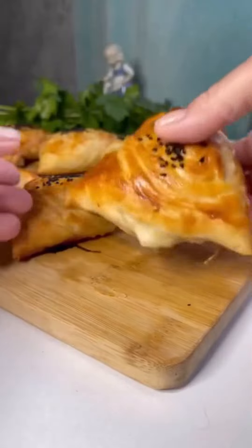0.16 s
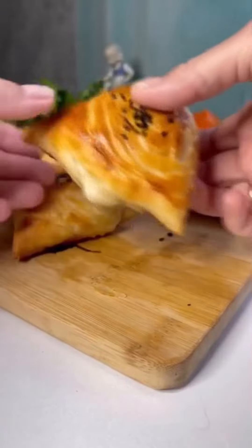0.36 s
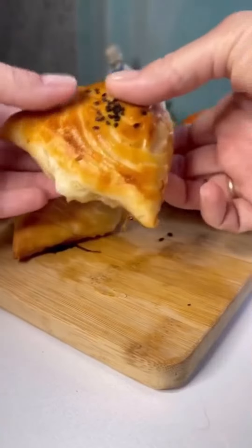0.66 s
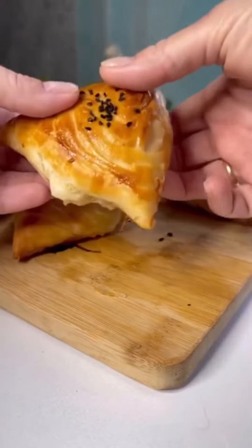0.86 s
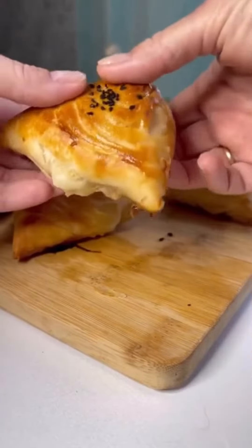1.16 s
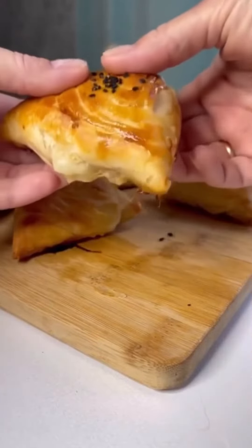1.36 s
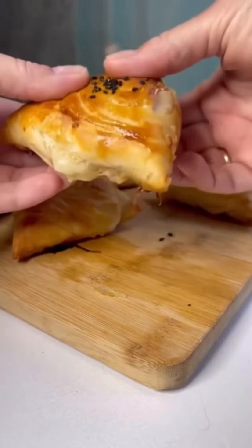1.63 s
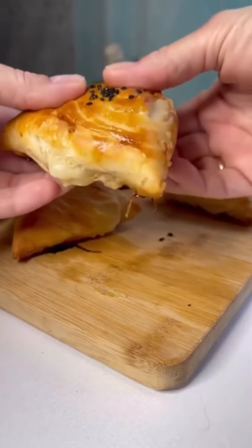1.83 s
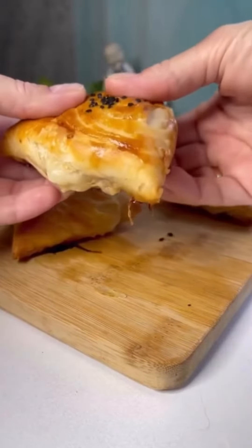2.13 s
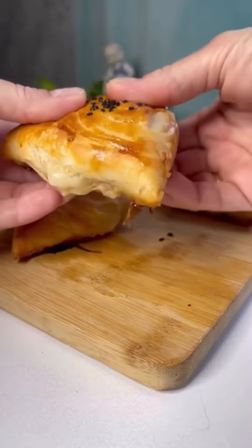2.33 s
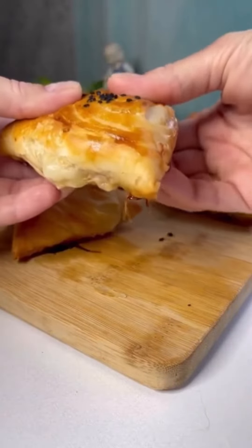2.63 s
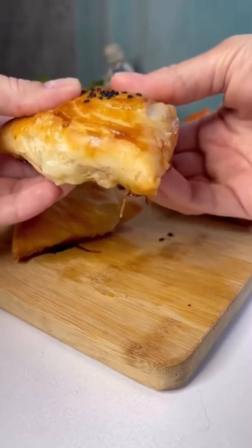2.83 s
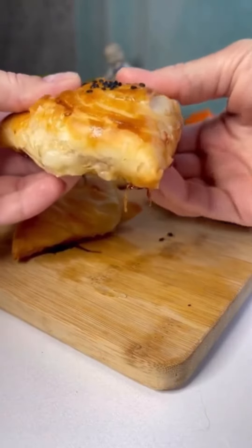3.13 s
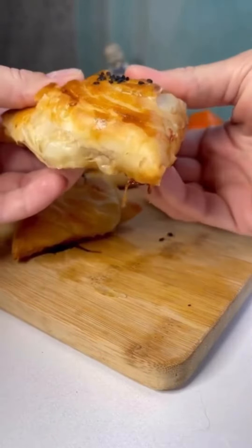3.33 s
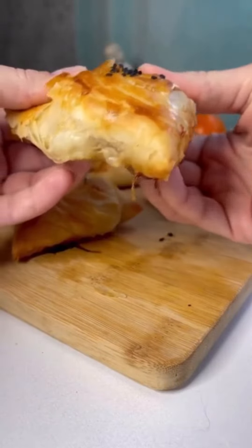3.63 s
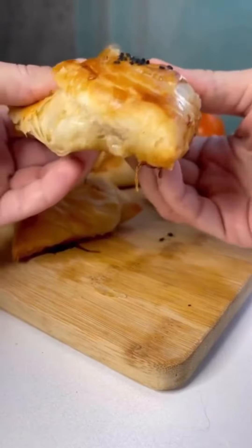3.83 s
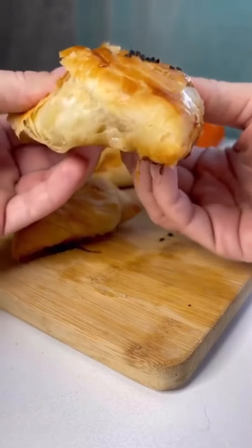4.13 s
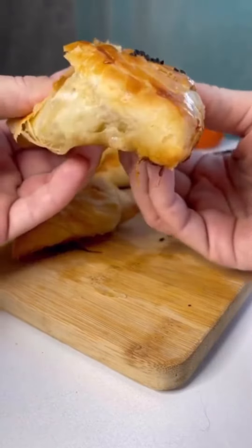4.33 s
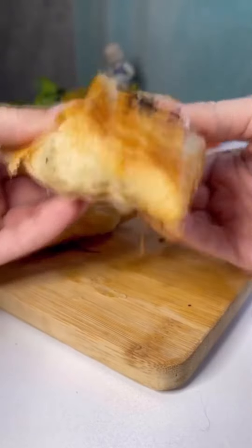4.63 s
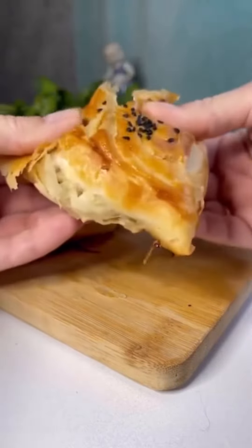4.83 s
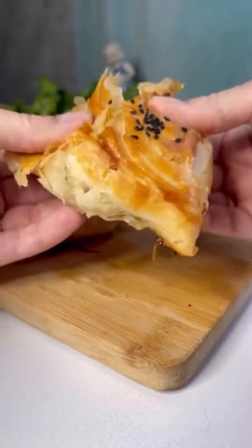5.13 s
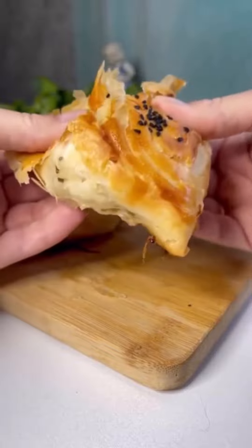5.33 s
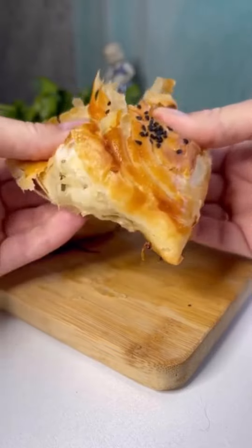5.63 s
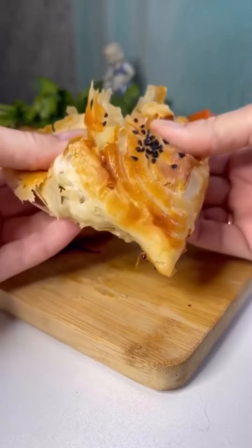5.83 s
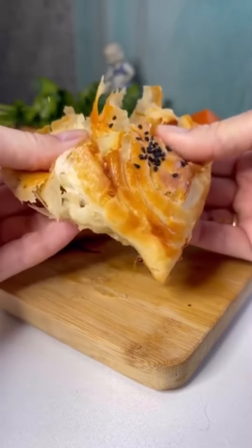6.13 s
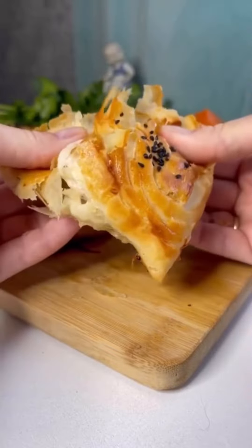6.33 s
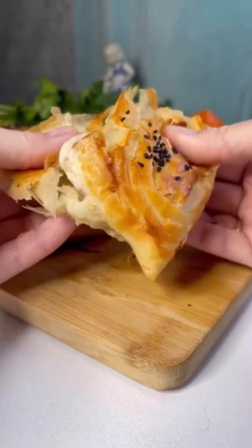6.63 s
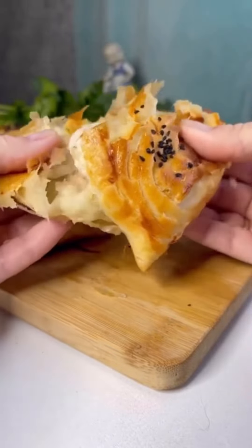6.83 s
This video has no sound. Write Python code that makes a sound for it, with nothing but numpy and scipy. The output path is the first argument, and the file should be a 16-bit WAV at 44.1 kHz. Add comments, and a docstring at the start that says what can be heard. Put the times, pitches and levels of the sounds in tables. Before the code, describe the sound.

A close phone microphone in a small kitchen, nearly dry with a brief reverberant tail. A quiet low appliance drone throbs about ten times a second over soft air noise and faint hiss throughout. For the first second there is little else: a tiny tick near 0.65 and a soft, low, falling bump at 0.9. At 1.1 crisp crust snaps break out, clustering until 1.4, with small hollow knocks. After a lull, crackling resumes at 1.6 and thickens from 2 to 3, brittle bursts over fine crumbling. The sharpest, brightest crack comes at 3.2; strong crunches continue to 3.9. From 4 to 4.8 it thins to light, fine, papery crackle, with a faint bump near 4.5. Moderate snaps return from 4.9 to 5.8, sharpest around 5.3, 5.6 and 5.7. After 6 there are sparse ticks and weak crumbling, a clearer snap near 6.45, then mostly hum until 7.

```python
"""A flaky pastry pulled apart

Two hands slowly pull a flaky baked pastry apart, close to a phone in a small kitchen.
The crust snaps in avalanches of tiny ringing fractures, over a fine crumbling of thin layers, and the
hollow body knocks in damped modes. Behind it an appliance drones and throbs as modulated sines over
filtered noise; the hands make two soft bumps of falling pitch, and a faint hiss lies under all."""
import sys
import numpy as np
from scipy import signal
from scipy.fft import rfft, irfft, next_fast_len
from scipy.io import wavfile
from scipy.ndimage import uniform_filter1d, map_coordinates

SR = 44100
rng = np.random.default_rng(int(sys.argv[2]) if len(sys.argv) > 2 else 0)


def waveform_to_disk(signal):
    """Save audio, clipped to [-1, 1], as 16-bit WAV at the path in sys.argv[1]."""
    frames = np.transpose(np.atleast_2d(signal))
    scaled = np.clip(frames, -1, 1) * 32767
    samples = np.round(scaled).astype(np.int16)
    wavfile.write(sys.argv[1], SR, samples)


N = 307332  # samples, just under 7 s


def amp(db):
    """Level is logarithmic: 20 dB make a tenfold amplitude."""
    return 10 ** (np.asarray(db) / 20)


def unit(x):
    """Mean power sets the level: scale to rms 1."""
    return x / np.sqrt(np.mean(x ** 2) + 1e-20)


def along(points, hz):
    """Pitch is logarithmic: interpolate (Hz, value) points on a log frequency axis."""
    f, v = np.transpose(points)
    return np.interp(np.log(hz + 1), np.log(f + 1), v)


def curve(rows):
    """Slow control: interpolate (second, value) rows linearly, holding the end values."""
    return np.interp(np.arange(N) / SR, *np.transpose(rows))


def wobble(rate):
    """Band-limited random modulation: a smooth curve through random knots, rate of them a second."""
    knots = rng.standard_normal(2000)
    return map_coordinates(knots, [np.arange(N) * rate / SR], mode="wrap")


def coloured(x, gain_db):
    """Minimum-phase filtering: folding the cepstrum makes a gain in dB by frequency causal."""
    size = 2 * next_fast_len(len(x) // 2 + 1024)
    gain = amp(gain_db(np.fft.rfftfreq(size, 1 / SR)))
    cepstrum = irfft(np.log(gain + 1e-6))
    cepstrum[1:size // 2] *= 2
    cepstrum[size // 2 + 1:] = 0
    response = np.exp(rfft(cepstrum))
    return irfft(rfft(x, size) * response, size)[:len(x)]


def band(points, hz):
    """Band limiting: a spectrum in dB, falling 24 dB per octave below its points and 96 above."""
    octaves_above = np.maximum(np.log2((hz + 1) / points[-1][0]), 0)
    octaves_below = np.maximum(np.log2(points[0][0] / (hz + 1)), 0)
    return along(points, hz) - 96 * octaves_above - 24 * octaves_below


def resonances(peaks, hz):
    """Resonance: a sum in dB of bell-shaped (Hz, half width Hz, dB) peaks and notches."""
    return sum(db / (1 + ((hz - centre) / width) ** 2) for centre, width, db in peaks)


def hiss():
    """Stationary random noise: the microphone's faint, steady hiss."""
    # Spectrum of the hiss. Each row: frequency in Hz, relative density in dB per Hz.
    hiss_colour = [(1000, 2), (4000, 16), (8200, 14.5), (9200, -16), (10100, 20.5), (11000, 21.5),
                   (11700, -18)]
    return amp(-66.0) * unit(coloured(rng.standard_normal(N), lambda hz: band(hiss_colour, hz)))


def throb(hz, db, beats_per_s, depth, ebb, ebb_every_s):
    """Amplitude modulation: a tone swells and sinks with an uneven beat that ebbs and returns."""
    t = np.arange(N) / SR
    beat = np.cos(2 * np.pi * beats_per_s * t + 1.0 * wobble(0.92))
    beat_depth = depth - ebb * np.cos(2 * np.pi * t / ebb_every_s)
    carrier = np.sin(2 * np.pi * hz * t + 0.42 * wobble(5.3))
    return amp(db) * unit((1 + beat_depth * beat) * carrier)


def appliance():
    """Additive synthesis: a throbbing drone and phase-modulated tones over resonant air noise."""
    # Steady motor and fan tones. Each row: frequency in Hz, rms level in dB before the overall gain.
    hum_tones = [(59.7, -62.5), (148, -66.5), (152.5, -62.5), (256, -65.5), (339, -65.5), (420, -66),
                 (462, -64.5), (619, -66), (764.5, -68), (875, -75.5), (1017, -74), (1120, -85)]
    # Air noise in the room. Each row: frequency in Hz, relative density in dB per Hz.
    air_colour = [(20, -16), (42, -4.5), (58, 1), (78, -4), (135, -4), (190, -1.5), (300, -4), (500, -6.5),
                  (640, -6), (800, -18), (950, -26.5), (1160, -14), (1400, -18), (1800, -21.5),
                  (2600, -18.5), (3200, -28), (5000, -32)]
    # Room resonances and notches in the air noise. Each row: centre in Hz, half width in Hz, gain in dB.
    room_peaks = [(265, 7.7, 1.5), (372, 14, -2), (422, 17, 5.5), (487, 16, -5), (529, 12, 4),
                  (623, 35, 3.5), (729, 16, -5.5), (780, 15, 6.5), (1163, 22, 4), (2540, 120, 2.5)]
    # Overall gain with one brief dip, ends held. Each row: time in seconds, gain in dB.
    dip = [(0.821, -1.5), (0.826, -13), (0.845, -19), (0.849, -1.5)]
    t = np.arange(N) / SR

    def tone(hz):
        """Phase modulation: the higher the tone, the more the motor's flutter blurs it."""
        flutter = 0.12 * wobble(3.88) + hz / 440 * wobble(30)  # radians
        wave = np.sin(2 * np.pi * (hz * t + rng.random()) + flutter)
        return unit(amp(2.8 * wobble(7)) * wave)  # each tone fades in and out by itself

    tones = sum(amp(db) * tone(hz) for hz, db in hum_tones)
    noise = rng.standard_normal(N)
    air = unit(coloured(noise, lambda hz: band(air_colour, hz) + resonances(room_peaks, hz)))
    air_gain = amp(-50.0 + 0.43 * wobble(5))
    drone = throb(hz=189.2, db=-52.5, beats_per_s=10.15, depth=0.61, ebb=0.23, ebb_every_s=1.83)
    return (drone + tones + air_gain * air) * amp(curve(dip))


def kitchen(x, t60, delay):
    """Diffuse reverberation: board and near walls answer with a short, exponentially fading tail."""
    t = np.arange(SR // 2) / SR
    tail = rng.standard_normal(len(t)) * amp(-60 * t / t60) * (t > delay)  # both times in seconds
    return signal.fftconvolve(x, tail / np.linalg.norm(tail))[:N]


def bumps():
    """Gliding pulse: as the hands shift their grip, a low, brief push sags in pitch."""
    # Soft bumps. Each row: centre in seconds, envelope peak in dB, pitch at the centre in Hz,
    # time from the peak to 1/e in ms, fall in octaves per second.
    hand_bumps = [(0.918, -38.5, 100, 6.5, 71), (4.472, -44.5, 75.2, 16, 3.1)]
    t = np.arange(-SR // 8, SR // 8) / SR
    out = np.zeros(N)
    for s, db, hz, length_ms, fall in hand_bumps:
        phase = 2 * np.pi * np.cumsum(hz * 2 ** (-fall * t)) / SR
        swell = np.exp(-(1000 * t / length_ms) ** 2)
        out[round(s * SR) - len(t) // 2:][:len(t)] += amp(db) * swell * np.sin(phase)
    return out


def knocks():
    """Modal synthesis: the soft, hollow body rings in damped modes as a larger piece lets go."""
    # Knocks. Each row: start in seconds, level in dB to which the mode levels are added.
    knock_times = [(1.13, -57), (1.175, -59), (1.215, -56), (1.527, -55), (2.112, -56.5), (2.194, -61),
                   (2.753, -57.5), (2.823, -53), (2.914, -55), (4.44, -56), (5.325, -55)]
    # Modes of the hollow pastry. Each row: frequency in Hz, mean relative level in dB, t60 in seconds.
    hollow_modes = [(496, 10, 0.074), (630, 15.5, 0.09), (710, 5, 0.075)]
    t = np.arange(SR // 8) / SR
    onset = 1 - np.exp(-t / 0.0025)
    out = np.zeros(N)
    for s, db in knock_times:
        ring = np.zeros(len(t))
        for hz, level, t60 in hollow_modes:
            fading = amp(level + rng.normal(0, 2) - 60 * t / t60)
            ring += fading * np.sin(2 * np.pi * hz * t)
        out[round(s * SR):][:len(t)] += amp(db) * ring * onset
    return out


def splinters(when, size, life_ms, length):
    """Impulsive excitation: each tiny fracture, at its sample, rings briefly at a pitch of its own."""
    t = np.arange(96) / SR
    count = len(when)
    hz = rng.uniform(800, 13500, (count, 1))
    life = life_ms / 1000 * np.exp(0.5 * rng.standard_normal((count, 1)))
    signed_size = (size * rng.choice([-1, 1], count))[:, None]
    # dividing by the root of the life keeps long rings from carrying more energy
    rings = signed_size * np.sin(2 * np.pi * hz * t) * np.exp(-t / life) / np.sqrt(life)
    places = when[:, None] + np.arange(len(t))
    return np.bincount(places.ravel(), rings.ravel(), length)[:length]


def fractures(length, count, spread_db, life_ms, rub):
    """Shot noise: splinters of unequal size over the noisy rub of the broken faces; rms 1."""
    size = amp(spread_db * np.clip(rng.standard_normal(count), -2, 2))
    shower = splinters(rng.integers(length, size=count), size, life_ms, length)
    return unit(unit(shower) + rub * rng.standard_normal(length))


def clumps(count):
    """Clustered shot noise: an rms 1 envelope of unequal little avalanches, each starting sharply."""
    spread_db, decay_ms = 3.0, 7.0
    steady = 0.75  # constant power between the avalanches, against their mean power of 1
    size = amp(spread_db * np.clip(rng.standard_normal(count), -2, 1.5))
    starts = ((np.arange(count) + rng.random(count)) * N / count).astype(int)
    ms = np.arange(SR // 30) / SR * 1000
    shape = (1 - np.exp(-ms / 0.5)) * np.exp(-ms / decay_ms)
    power = abs(signal.fftconvolve(np.bincount(starts, size ** 2, N), shape ** 2)[:N])
    return unit(np.sqrt(power / power.mean() + steady))


def dappled(x, depth_db):
    """Time-varying spectrum: the colour shifts as one flake after another takes the strain; rms 1."""
    z = signal.stft(x, nperseg=256)[2]
    field = rng.standard_normal(z.shape)
    field = uniform_filter1d(field, size=4, axis=0)  # smooth over frequency
    field = uniform_filter1d(field, size=6, axis=1)  # smooth over time
    return unit(signal.istft(z * amp(depth_db * unit(field)), nperseg=256)[1][:N])


def crumbling():
    """Size sets spectrum: thin layers splinter in clumps, large flakes sounding lower and longer."""
    # Strain of the layers. Each row: time in seconds, crumbling level in dB before random fluctuation.
    strain_level = [(0.0, -88), (0.5, -91), (0.59, -62), (0.67, -83), (1.06, -71), (1.12, -51.5),
                    (1.38, -49.5), (1.44, -54.5), (1.51, -59), (1.68, -47), (1.81, -51), (1.9, -47),
                    (1.97, -52), (2.005, -62), (2.07, -45), (2.22, -42.5), (2.26, -50.5), (2.33, -46.5),
                    (2.53, -53.5), (2.72, -45.5), (2.95, -44.5), (3.17, -48.5), (3.31, -44.5),
                    (3.42, -47.5), (3.47, -52), (3.62, -43), (3.68, -51.5), (3.79, -43), (3.91, -56),
                    (4.12, -46), (4.215, -60), (4.26, -53.5), (4.4, -52.5), (4.57, -56), (4.63, -63),
                    (4.77, -60.5), (4.8, -53), (4.84, -59), (4.9, -47.5), (4.955, -55.5), (5.0, -46),
                    (5.38, -48.5), (5.44, -59.5), (5.5, -47), (5.76, -53), (5.785, -51), (5.85, -49.5),
                    (5.95, -57), (6.13, -52.5), (6.19, -58), (6.235, -83), (6.29, -55), (6.33, -62),
                    (6.37, -53.5), (6.64, -51.5), (6.73, -66), (6.97, -58)]
    # Splinter size. Each row: time in seconds, brightness in dB as small flakes' gain over large ones.
    fineness = [(0.6, 0.5), (1.1, -11), (1.6, -7), (2.1, -3.5), (3.0, -1), (3.8, -5), (4.36, 11),
                (4.48, 15.5), (4.75, 3), (4.9, 1), (5.2, -2), (5.7, 3.5), (6.9, -5)]
    # Colour of the crumbling. Each row: frequency in Hz, relative density in dB per Hz.
    flake_colour = [(300, -47), (900, -5), (1250, -22), (1750, -0.5), (2300, -3.5), (2750, 1.5), (4750, -3),
                    (8100, -2.5), (8700, -9), (9600, -4), (10100, 0), (11200, 3.5), (11700, -3),
                    (12800, -27)]
    strain = amp(curve(strain_level) + 1.25 * wobble(35)) * clumps(count=800)
    fine = amp(curve(fineness) / 2)  # half the contrast goes to each size
    large = fractures(N, count=9000, spread_db=3, life_ms=0.11, rub=1.0)
    large = amp(0.5 * wobble(70)) * large / fine
    small = fractures(N, count=14000, spread_db=3, life_ms=0.06, rub=1.0)
    small = amp(1.1 * wobble(78)) * small * fine
    low_tilt = [(3000, -6.5), (7000, 3.5), (10000, -5)]  # Hz, dB
    high_tilt = [(3000, -2.0), (7000, -1.0), (10000, 6.5)]
    low = coloured(large, lambda hz: band(flake_colour, hz) + along(low_tilt, hz))
    high = coloured(small, lambda hz: band(flake_colour, hz) + along(high_tilt, hz))
    return strain * dappled(low + high, depth_db=2.5)


def avalanche(ms, decay_ms):
    """Chain reaction: an accelerating build-up to the peak at 0 ms, then exponential dying away."""
    rise_ms = 3.9 + 0.22 * decay_ms  # a longer avalanche also builds up longer
    return np.exp(-np.where(ms < 0, (abs(ms) / rise_ms) ** 1.4, ms / decay_ms))


def flake(body_db, bright_db, ring_hz, ring_db):
    """Modal colour: a flake's gain in dB by frequency, with a tilt, one main resonance and weak ones."""
    # Common colour of a crust fracture. Each row: frequency in Hz, relative density in dB per Hz.
    crust_colour = [(300, -7.5), (900, -21), (1250, -15), (1750, -17), (2250, -10.5), (2750, -8.5),
                    (4750, -6), (8100, 1.5), (8700, 1), (9500, -2.5), (10100, 10), (11200, 10.5),
                    (11700, 4), (12800, -7.5)]
    ring_width_hz, ripple_db = 570, 3.5  # half width of the main resonance, depth of the weak ones
    tilt = [(800, 0), (1150, body_db / 2), (1600, body_db / 3), (2000, body_db), (3000, body_db),
            (5000, 0), (8000, 0.0049), (10500, bright_db), (11500, bright_db), (12900, bright_db / 2)]
    heights = np.pad(rng.standard_normal(70), 1)
    weak = np.column_stack([np.geomspace(1200, 13000, num=72), heights])

    def gain_db(hz):
        """Superposition in dB of the flake's resonances on the crust's colour."""
        strong = ring_db / (1 + ((hz - ring_hz) / ring_width_hz) ** 2)
        return band(crust_colour, hz) + along(tilt, hz) + strong + ripple_db * along(weak, hz)

    return gain_db


def snaps():
    """Cascading fracture: each break sets off its neighbours, swelling to a peak and dying out."""
    # Snaps of the crust. Each row: peak time in seconds, level in dB before nearby reflections,
    # decay to 1/e in ms, lower mids (2 to 3 kHz) in dB, brightness (10.5 to 11.5 kHz) in dB,
    # pitch of the flake in Hz, height of its resonance in dB.
    crust_snaps = [(0.648, -43, 4, 10, -6, 5160, 7), (1.09, -37.5, 4.4, 8, -12, 4850, 12),
                   (1.102, -31, 3.3, 8.5, -2, 7800, 12), (1.13, -33.5, 8.3, 9.5, -9.5, 1400, 4),
                   (1.153, -35.5, 22, 7, -8, 8500, 3), (1.175, -37, 6.8, 10, -8, 7050, 9),
                   (1.21, -37, 19, -2, -7, 2700, 12.5), (1.222, -34, 12, 4.5, -1, 6600, 6),
                   (1.268, -40.5, 18, -3, -10, 2400, 10), (1.297, -31.5, 3.2, 8, -1.5, 4800, 6),
                   (1.319, -35, 6, 2, -4.5, 2700, 2), (1.327, -28.5, 5.7, 0, 3, 3900, 4),
                   (1.335, -26, 10, 1.5, 4.5, 4200, 5), (1.352, -36.5, 21, 2, -17, 5400, -1),
                   (1.373, -36.5, 17, -1.5, 3, 2670, 17), (1.424, -46, 12, 12, -8, 3000, 3),
                   (1.468, -49, 38, -5, -1, 7400, 15), (1.528, -39.5, 12, 11, -5, 4950, 0),
                   (1.55, -42, 37, -8, -8, 2400, 7), (1.625, -36, 13, -1, -3.5, 2380, 9),
                   (1.648, -34.5, 16, 1.5, -4, 2370, 9), (1.675, -39, 11, 8, -15, 7740, 9),
                   (1.691, -42, 6.6, 5, -21, 3900, 4), (1.742, -43.5, 20, 7, -13, 5740, 13),
                   (1.829, -24.5, 3.0, 5.5, -17.5, 5170, 7), (1.876, -40.5, 17, 10, -9, 4800, 3),
                   (1.955, -37.5, 15, 4.5, -23, 4650, 3), (1.975, -29.5, 8.7, 9.5, 3.5, 5600, 7),
                   (2.02, -29, 3.5, 1, 7, 5900, 8), (2.053, -29.5, 3.1, 8, -18, 8040, 16.5),
                   (2.104, -33, 22, 3.5, -15, 4130, 4), (2.136, -43, 16, 5, -5, 5400, 2),
                   (2.193, -29.5, 8.9, 3.5, -3.5, 7460, 3), (2.27, -46, 8.2, 7, -7, 5000, 4),
                   (2.386, -32.5, 7.6, -1.5, -7, 2370, 6), (2.469, -45.5, 14, 3, -14, 6400, 3),
                   (2.563, -42, 5.6, 9, -3, 2670, 19), (2.599, -38, 39, 8.5, -11, 5400, 10.5),
                   (2.635, -40, 24, -9, -7, 5760, 5), (2.683, -34.5, 5.6, 15, -2, 6300, 5),
                   (2.753, -25, 6.3, 11.5, -4.5, 7800, 12), (2.768, -33, 8.8, 10, -6, 5850, 12),
                   (2.799, -45, 23, 6, -7, 2700, 5), (2.827, -22.5, 2.2, 7.5, -10, 3500, 15.5),
                   (2.838, -37, 6.5, -3, -10, 3900, 13), (2.888, -39, 32, 10, -5, 5400, 8),
                   (2.915, -34.0, 8.4, 9, -8, 6100, 12), (2.948, -37.5, 18, -3, -10, 2550, 4),
                   (2.971, -35, 7.8, -0.5, -18, 4950, 0), (3.006, -28, 7.5, -1.5, -12, 3930, 3.5),
                   (3.025, -41, 18, 10, -8, 4200, 9), (3.056, -27.5, 4.1, 10.5, -8, 8040, 18.5),
                   (3.073, -44, 5.1, 15, -13, 4000, 10), (3.108, -36.5, 12, 5.5, -10, 4050, 6),
                   (3.156, -48, 8, 7, -10, 5000, 7), (3.202, -30.5, 6.2, 5, -2, 4650, 5),
                   (3.222, -17, 2.9, 10.5, 14.5, 7700, 15), (3.25, -26, 14, 0.5, -0.5, 3800, 11),
                   (3.277, -32, 7.6, 8, -2, 4650, 11), (3.368, -33, 19, -1, -10, 7900, 4),
                   (3.379, -36, 7, 4, -6, 4050, 14), (3.438, -34, 6.6, 5, -2, 7500, 5),
                   (3.547, -34, 5.1, 19, -6, 7800, 8), (3.567, -34.5, 18, 5, -5.5, 4050, 8),
                   (3.605, -27, 5.4, 9.5, 3, 4000, 1), (3.626, -32.5, 13, 6, 1, 4350, 6),
                   (3.729, -38.5, 17, 4.5, 6, 5550, 9), (3.781, -31.5, 12, 5, -1, 7100, 10),
                   (3.813, -26.5, 5.7, 6, -3, 7100, 8), (3.842, -23.5, 5.7, 12, 6, 4600, 3),
                   (3.962, -42.5, 11, 12, -3, 4640, 20), (4.012, -39.5, 15, 8, -3, 7400, 11),
                   (4.052, -33, 11, 4, 1, 7860, 4), (4.236, -39.5, 6.3, 11, 7, 4500, 4),
                   (4.248, -38.5, 9.7, 14, 1, 4650, 3), (4.274, -42.5, 9.1, 10, -5, 5000, 4),
                   (4.296, -40, 6.2, 8, 3, 6400, 4), (4.365, -50, 7, -3, -10, 7800, 2),
                   (4.416, -43, 11, -4, 7, 6600, 11), (4.449, -39, 25, -2, 11, 6650, 13),
                   (4.564, -44.5, 17, 0, 25, 6600, 1), (4.796, -45, 17, 8, 18, 2400, 10),
                   (4.861, -46.5, 18, 6, -4, 3900, 7), (4.929, -41.5, 5, 5, 1, 4000, 6),
                   (4.972, -42, 4.4, 8, -10, 5400, 7), (4.994, -35, 4.5, -2, 9, 7500, 8),
                   (5.019, -36.5, 23, -1, -3, 3900, 4.5), (5.047, -41, 7, -4, -2, 2700, -2),
                   (5.06, -41, 15, 5, -4, 6400, 2), (5.102, -40.5, 8.8, 6, -5, 4000, 9),
                   (5.129, -39, 23, 4.5, -4.5, 4950, 3), (5.242, -42.5, 7.1, -4, -13, 2700, 10),
                   (5.259, -38.5, 6.6, -4, -19, 4050, 6), (5.327, -30, 3.8, 7, 2.5, 4200, 11.5),
                   (5.337, -36, 4.6, 2, 0, 2550, 13), (5.362, -43, 9.7, 9, -3, 4000, 0),
                   (5.458, -33.5, 4.2, 11, -2, 4760, 4), (5.581, -42, 5.3, 5, 2, 2700, 4),
                   (5.619, -28, 3.5, -3.5, -7, 1460, 8), (5.642, -45.5, 5, 9.5, -12, 4000, 10),
                   (5.686, -44.5, 11, 6, -3, 1500, 5), (5.705, -45, 5, 0, -1, 6400, 5),
                   (5.735, -27.5, 3.5, 0.5, -7.5, 7800, 4), (5.813, -44, 16, 8, -7, 4070, 5),
                   (5.844, -46.5, 9, 7, -4, 2700, 5), (6.121, -52, 6, 9, -7, 4700, 9),
                   (6.2, -42, 3.6, -2, 5, 7650, 2), (6.263, -46.5, 8.4, -2, -3, 7000, -3),
                   (6.379, -42, 5.6, -5, 9, 7800, 13), (6.415, -35, 3.3, -1, -13, 1500, 10),
                   (6.455, -30, 3.4, -10, 6, 2400, 7), (6.482, -49, 5, 2, 3, 6400, 1),
                   (6.556, -40, 8.7, 3, -7.5, 6600, 8), (6.834, -53, 4, -2, 3, 7800, 1),
                   (6.953, -50.5, 16, -7, 13, 7800, 2)]
    lead = SR // 14  # samples ahead of the peak
    ms = np.arange(-lead, 2 * lead) / SR * 1000
    out = np.zeros(N + SR)
    for s, db, decay_ms, body_db, bright_db, ring_hz, ring_db in crust_snaps:
        swell = avalanche(ms, decay_ms)
        breaks = swell * fractures(len(ms), count=600, spread_db=1.5, life_ms=0.15, rub=1.0)
        breaks[lead] += 1.2  # the main crack
        crack = unit(coloured(breaks, flake(body_db, bright_db, ring_hz, ring_db)))
        swell_rms = np.sqrt(np.mean(swell ** 2))  # makes the level count at the peak of the swell
        out[round(s * SR) - lead:][:len(ms)] += amp(db) * crack * swell_rms
    return out[:N]


def scene():
    """Superposition: the pastry close by and mostly dry, the kitchen behind it."""
    # Nearby surfaces colour snaps and crumbling alike. Each row: centre in Hz, half width in Hz, gain in dB.
    nearby = [(1186, 63, 0), (2720, 37, 4.5), (3000, 43, 1.5), (3140, 91, -3), (4030, 120, 3),
              (5100, 63, 2.5), (5000, 92, 1), (6360, 105, 4.5), (6480, 98, -2.5), (7300, 81, -1),
              (8300, 100, 1), (9970, 48, 2), (11300, 140, -13), (11800, 91, 11)]
    pastry = coloured(snaps() + crumbling(), lambda hz: resonances(nearby, hz)) + knocks()
    answer = amp(-17) * kitchen(pastry, t60=0.16, delay=0.0064)
    return (pastry + answer + bumps() + appliance() + hiss())[None]


def record(dry):
    """Low-pass filtering: the phone's band limit cuts steeply above 13 kHz without phase shift."""
    top_hz = 13000
    size = next_fast_len(N + SR // 2)
    hz = np.fft.rfftfreq(size, 1 / SR)
    return irfft(rfft(dry, size) / np.sqrt(1 + (hz / top_hz) ** 120), size)[:, :N]


dry = scene()
out = record(dry)
waveform_to_disk(out)
```